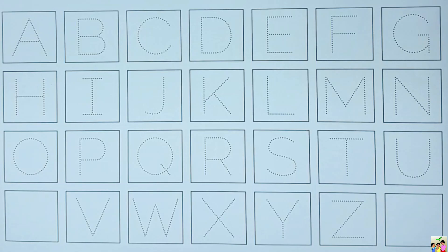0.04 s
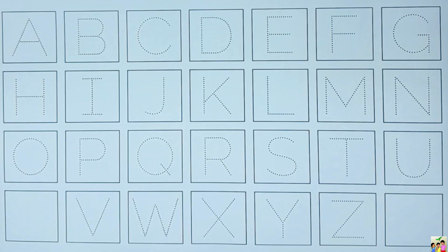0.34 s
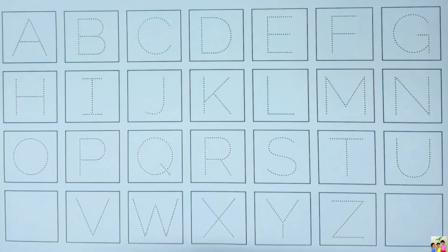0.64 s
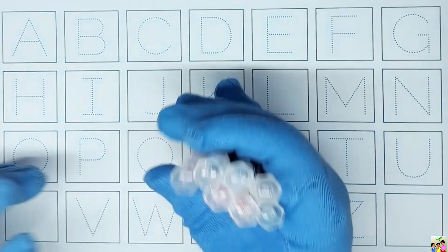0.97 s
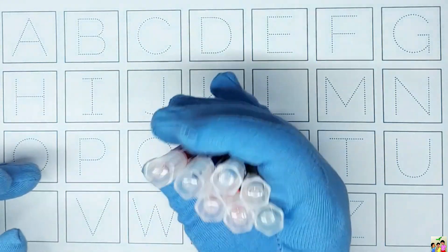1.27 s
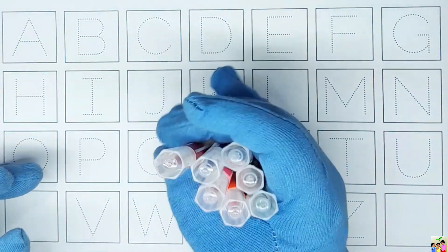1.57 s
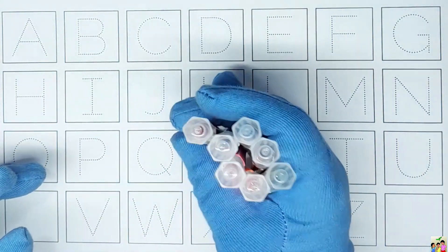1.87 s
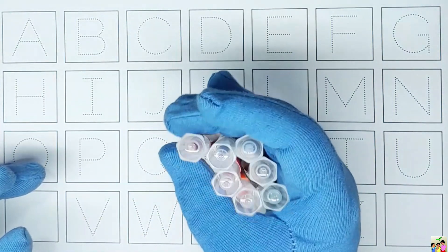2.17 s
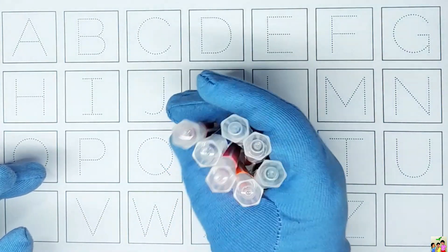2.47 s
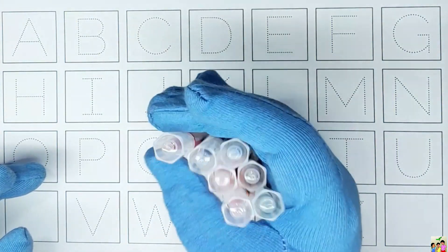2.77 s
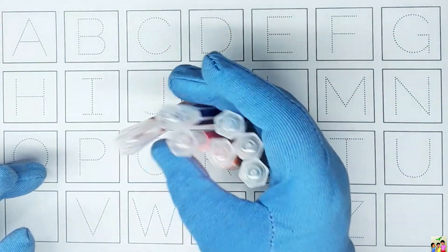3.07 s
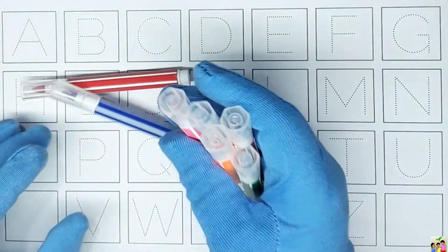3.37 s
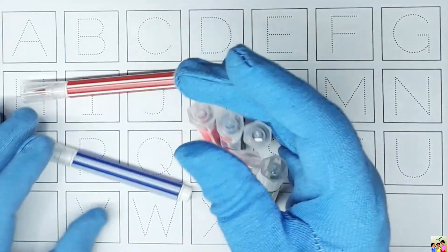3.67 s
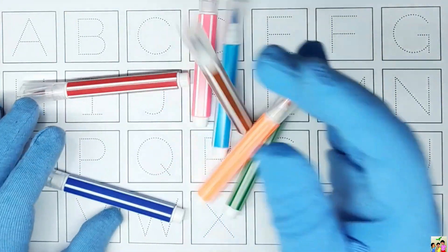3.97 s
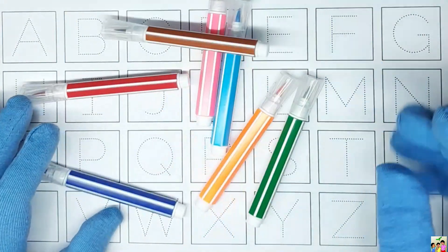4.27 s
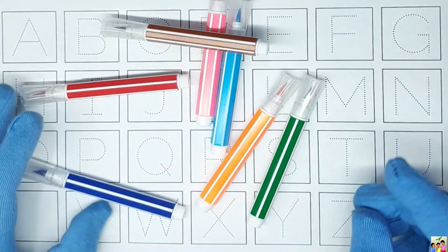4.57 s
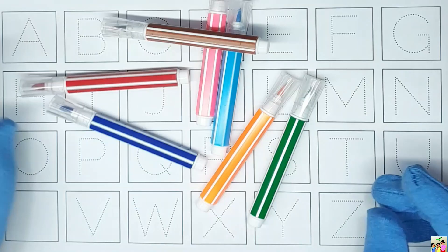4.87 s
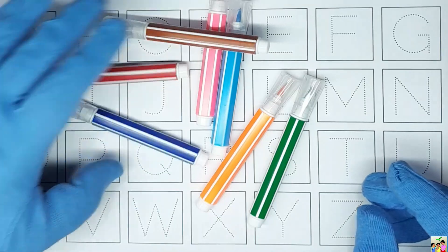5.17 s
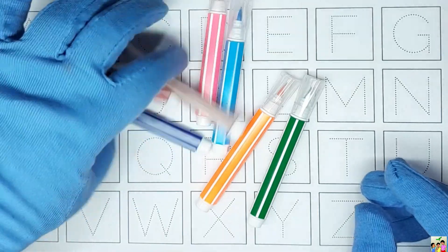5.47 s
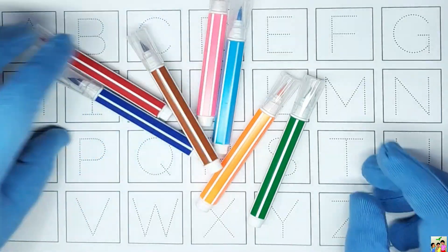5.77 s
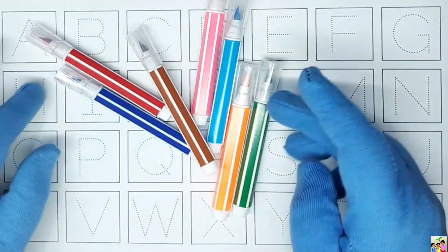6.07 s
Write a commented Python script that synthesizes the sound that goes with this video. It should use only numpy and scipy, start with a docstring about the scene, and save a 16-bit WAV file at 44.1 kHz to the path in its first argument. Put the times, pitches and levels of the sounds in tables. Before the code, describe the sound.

Hollow knocks of bundled plastic pens on a tabletop, followed by loose pens clacking down, soft hand bumps and faint paper rubbing.

```python
"""Thuds, clacks and ticks of plastic felt-tip pens: a gloved hand knocks a bundle upright on a
paper-covered table, lets the pens fall and pushes them about; one rolls over. Each blow rings the
table top, and gloves and barrels rub the paper. A stereo pair hears it slightly from the right, in a
small bare room, far enough off for the walls to ring after every blow.
Underneath lie a low rumble, a faint hum and a thin high whine."""
import sys
import numpy as np
from scipy import signal
from scipy.fft import rfft, irfft, next_fast_len
from scipy.io import wavfile

SR = 44100
rng = np.random.default_rng(int(sys.argv[2]) if len(sys.argv) > 2 else 0)


def log_audio(samples):
    """Write samples as a 16-bit WAV file to the path given in sys.argv[1]."""
    # one column per channel
    frames = np.atleast_2d(samples).T
    # limit to full scale, then quantise
    limited = np.clip(frames, -1, 1)
    pcm = np.round(limited * 32767).astype(np.int16)
    wavfile.write(sys.argv[1], SR, pcm)


N = 278712
BLOW_T = np.arange(SR // 8) / SR  # time axis of one blow, s

# middle modes of the table top: [f/Hz, level/dB, t60/s]
TABLE_BOARD_MODES = [(448, -4.5, 0.1), (486.6, 0.5, 0.063), (511, -12, 0.14), (590.2, -4, 0.099)]
# spectrum of a plastic barrel's tick: [f/Hz, level/dB]
BARREL_TICK = [(1500, -25), (3000, 2), (4800, 0.5), (6200, -1.5), (7500, 0.5), (9500, -10), (13000, -13.5),
               (16000, -18)]


def undb(db):
    """Decibels to gain."""
    return 10 ** (np.asarray(db) / 20)


def along(points, hz):
    """Read (f/Hz, value) points on a log-frequency axis."""
    f, value = np.transpose(points)
    return np.interp(np.log(hz + 1), np.log(f), value)


def colour(x, points):
    """Causal filter with the gain of (f/Hz, level/dB) points."""
    size = 2 * next_fast_len(x.shape[-1])
    cepstrum = irfft(along(points, np.fft.rfftfreq(size, 1 / SR)) * np.log(10) / 20)
    cepstrum[1:size // 2] *= 2  # fold to minimum phase
    cepstrum[size // 2 + 1:] = 0
    return irfft(rfft(x, size) * np.exp(rfft(cepstrum)))[..., :x.shape[-1]]


def high_pass(x, hz):
    """Low cut: below its modes the table top moves too little air to be heard."""
    return signal.sosfilt(signal.butter(4, hz, "high", fs=SR, output="sos"), x)


def fade(t, t60):
    """Exponential decay, 60 dB in t60 seconds."""
    return np.exp(-np.log(1000) * t / t60)


def level(x, db):
    """Scale a steady sound to an rms level."""
    return x * undb(db) / np.sqrt(np.mean(x ** 2))


def unit(x):
    """Scale a short sound to the energy of 10 ms at full level."""
    return x / np.sqrt(np.mean(x ** 2) * x.shape[-1] / (SR / 100))


def pan(db):
    """Gains at the two microphones; negative dB leans right."""
    return undb(np.array([[db], [-db]]) / 2)


def add(track, s, sound):
    """Mix a sound into a track at s seconds."""
    start = int(s * SR)
    track[:, start:start + sound.shape[-1]] += sound[..., :N - start]


def diffuse(size, wide_hz):
    """White noise from all around: long waves reach both microphones alike, short ones unrelated."""
    mid, side = rng.standard_normal((2, size))
    hz = np.fft.rfftfreq(size, 1 / SR)
    apart = hz ** 2 / (hz ** 2 + wide_hz ** 2)
    pair = rfft(mid) + np.array([[1], [-1]]) * apart * rfft(side)
    return irfft(pair / np.hypot(1, apart), size)


def background(wide_hz, waver_db):
    """Room tone: a low rumble from all around, a wavering hum and a narrow hissing whine."""
    # spectra of the rumble and the whine: [f/Hz, relative level/dB]
    rumble_colour = [(20, -17.5), (36, -25), (48, -0.5), (62, -3.5), (80, 0.5), (98, -3.5), (120, -13.5),
                     (200, -12), (350, -21), (600, -20), (1000, -28.5), (2000, -36.5), (5000, -48),
                     (16000, -54.5)]
    whine_colour = [(5600, -32), (6250, -18), (6700, -5), (7100, -1.5), (7500, 3.5), (7900, -7),
                    (8400, -22.5), (9200, -41.5), (9950, -20), (10800, -49.5)]
    # tones of the hum: [f/Hz, rms level/dB]
    hum_tones = [(74.7, -54), (151, -64), (277, -67), (441.4, -70), (739, -64)]
    rumble = level(colour(diffuse(N, wide_hz), rumble_colour), db=-47.5)
    t = np.arange(N) / SR
    knots = np.linspace(0, N / SR, 40)
    hum = np.zeros(N)
    for hz, db in hum_tones:
        waver = waver_db * np.interp(t, knots, rng.standard_normal(len(knots)))
        hum += undb(db + waver) * np.sqrt(2) * np.sin(2 * np.pi * (hz * t + rng.random()))
    whine = level(colour(rng.standard_normal((2, N)), whine_colour), db=-56)
    return rumble + hum + pan(-1.0) * whine


def room(wide_hz, build_s, standing_db):
    """Bare walls: returns a function that adds standing waves and a diffuse tail to the direct sound."""
    # decay of the tail: [f/Hz, t60/s]
    tail_decay = [(200, 0.75), (1000, 0.5), (3000, 0.5474), (7000, 0.47), (15000, 0.49)]
    # spectrum of the tail: [f/Hz, level/dB]
    tail_colour = [(100, -15.5), (200, 1.5), (300, -5), (500, 1.5), (1000, 4), (2500, 4), (5000, 4),
                   (9000, -2), (15000, 1)]
    # standing waves between the walls: [f/Hz, relative level/dB, t60/s]
    wall_modes = [(191.2, -2.5, 0.98), (233.8, -1.5, 0.86), (279.3, -12.5, 0.65), (523.6, 2.5, 0.38),
                  (592.7, -12.5, 0.72), (758.6, 4, 0.52), (1050, -6.5, 0.35), (1120, -18, .5),
                  (1185, 0.5, 0.25), (1430, 16.5, 0.12)]
    t = np.arange(SR * 4 // 5) / SR
    size = 2 * SR
    hz = np.fft.rfftfreq(size, 1 / SR)
    noise = rfft(colour(diffuse(size, wide_hz), tail_colour))
    centres, band_t60 = np.transpose(tail_decay)
    band_gains = [along(list(zip(centres, share)), hz) for share in np.eye(len(centres))]
    bands = np.array([irfft(noise * gain) for gain in band_gains])
    # reflections thicken within milliseconds; the bass lingers longest
    decay = fade(t, band_t60[:, None]) * (1 - np.exp(-(t / build_s) ** 2))
    decay /= np.sqrt(np.mean(np.sum(decay ** 2, axis=1)))
    standing = sum(undb(standing_db + db) * np.cos(2 * np.pi * f * t) * fade(t, t60)
                   for f, db, t60 in wall_modes)

    def echo(sound, wet_db, waves_db):
        """Every spot on the table sends its own reflections to the microphones."""
        spot = int(rng.random() * SR)
        tail = np.einsum("bct,bt->ct", bands[:, :, spot:spot + len(t)], decay)
        direct = t == 0
        response = direct + undb(wet_db) * tail + undb(waves_db) * standing
        return signal.fftconvolve(sound, response, axes=1)
    return echo


def ring(modes, scatter_db, apart, tilt_db=0):
    """Damped modes: the struck spot sets their strengths, and each microphone hears its own phase."""
    hz, db, t60 = np.transpose(modes)[:, :, None]
    strength, turn = rng.standard_normal((2, len(modes), 1))
    octaves = np.log2(hz / hz[0])
    envelopes = undb(db + scatter_db * strength + tilt_db * octaves) * fade(BLOW_T, t60)
    phase = 2 * np.pi * hz * BLOW_T
    pair = np.array([np.sum(-envelopes * np.sin(phase + side * apart * turn), axis=0)
                     for side in (1, -1)])
    contact_s = 0.00022  # the time a blow takes to press home
    return unit(pair * (1 - np.exp(-(BLOW_T / contact_s) ** 2)))


def crack(points, t60, shared):
    """Modes too dense to tell apart: a coloured burst, partly the same at both microphones."""
    common, *own = rng.standard_normal((3, len(BLOW_T)))
    noise = np.sqrt(shared) * common + np.sqrt(1 - shared) * np.array(own)
    return unit(colour(noise * fade(BLOW_T, t60), points))


def thump(scatter_db, low_hz):
    """The dull note of the struck table."""
    # lowest modes of the table top: [f/Hz, level/dB, t60/s]
    thud_modes = [(199.3, -5.5, 0.25), (227, 8, 0.047), (264, 2, 0.041), (296, -10, 0.066)]
    return unit(high_pass(ring(thud_modes, scatter_db, apart=0.14), low_hz))


def sliding(grain_db, attack_s, release_t60):
    """Paper fibres catch and let go in dense, uneven slips; each stroke swells, holds and dies away."""
    # strokes of gloves and barrels over the paper: [t/s, length/s, level/dB]
    strokes = [(0.85, .25, -62.5), (2.033, 0.34, -61.5), (3.2, 0.23, -51.5), (4.847, 0.11, -51.5),
               (5.59, 1, -58.5)]
    # spectrum of the rubbing: [f/Hz, relative level/dB]
    rub_colour = [(200, -18), (800, 5), (1300, 10), (1800, -4), (4000, -16), (9000, -22), (15000, -27)]
    t = np.arange(N) / SR
    effort = np.zeros(N)
    for s, length, db in strokes:
        swell = np.clip((t - s) / attack_s, 0, 1)
        effort += undb(db) * swell * fade(np.maximum(t - s - length, 0), release_t60)
    sizes = undb(grain_db * np.minimum(rng.exponential(size=N), 4))
    slips = rng.standard_normal((2, N)) * sizes * (rng.random(N) < .1)
    return level(colour(slips, rub_colour), db=0) * effort


def hands(echo):
    """Tiny ticks as the barrels shift between the fingers, and soft bumps of the hands."""
    # barrels shifting in the grip: [t/s, level/dB]
    shifts = [(1.608, -50), (1.6477, -57.5), (2.57, -59), (3.254, -59), (3.268, -54), (3.319, -50.5),
              (3.3577, -52.5)]
    # gloved hands bumping the table: [t/s, level/dB]
    bumps = [(3.291, -34), (3.344, -34.5), (3.525, -37.5), (4.204, -35), (4.818, -45), (5.425, -48.5),
             (5.708, -48.5), (6.069, -44.5)]
    out = np.zeros((2, N))
    for s, db in shifts:
        tick = undb(db) * crack(BARREL_TICK, t60=.015, shared=0.53)
        add(out, s, echo(tick, wet_db=-3.5, waves_db=-4))
    for s, db in bumps:
        thud = undb(db) * thump(scatter_db=13.5, low_hz=144)
        add(out, s, echo(thud, wet_db=3.5, waves_db=4.5))
    return out


def pen(db, weight_db, hardness_db):
    """A loose pen lands: hard plastic cracks brightly, and the light barrel thumps the table."""
    # spectrum of the pen's clack: [f/Hz, level/dB]
    clack_colour = [(200, -14.5), (420, 12.5), (700, 5.5), (1400, 6), (2200, 4.5), (3200, 0), (4500, -14),
                    (7000, -24), (12000, -83)]
    thud = thump(scatter_db=0, low_hz=173)
    board = undb(-7) * ring(TABLE_BOARD_MODES, scatter_db=14.5, apart=0.39, tilt_db=-36)
    clack = undb(db) * crack(clack_colour, t60=0.07, shared=0.39)
    tick = undb(db + hardness_db) * crack(BARREL_TICK, t60=0.033, shared=0.36)
    return pan(-1.6) * undb(db + weight_db) * (thud + board) + pan(-2.0) * (clack + tick)


def rolling(echo, start_s, face_s, count):
    """A six-sided pen tips gently off its face, then taps the paper with each next one."""
    out = np.zeros((2, N))
    for face in range(count):
        tap = pen(db=-57.5 if face == 0 else -46.5, weight_db=3, hardness_db=-18.5)
        add(out, start_s + face * face_s, echo(tap, wet_db=-3, waves_db=2))
    return out


def clatter(echo):
    """Pens fall from the hand and are pushed into each other."""
    # hits of loose pens: [t/s, level/dB, weight on the table/dB, hardness of the contact/dB]
    hits = [(3.411, -29, -0.5, -4), (3.468, -36, 3, -8.5), (4.04, -27, 4, -0.5), (4.081, -27.5, -5, 0),
            (4.1, -33, 11, -1), (4.156, -30.5, 6.5, -5.5), (4.281, -33, 7, -5.5), (4.343, -38.5, -7, -4),
            (5.569, -43.5, 12.5, -6), (5.629, -45.5, 14.5, 5), (5.687, -48.5, 14, -5),
            (6.097, -43.5, 7.5, 2)]
    out = np.zeros((2, N))
    for s, db, weight_db, hardness_db in hits:
        add(out, s, echo(pen(db, weight_db, hardness_db), wet_db=-2, waves_db=2))
    return out


def knock(s, db, weight_db):
    """Butt ends meet the table; paper softens the contact, so the top speaks more than the plastic."""
    # the bundle wanders over the table, shifting weight between board modes: [t/s, tilt/dB per octave]
    spot_tilt = [(1.1, 21), (1.5, 23.5), (2.3, -4), (2.95, -3), (3.8, -13.5)]
    # high modes of the table top: [f/Hz, level/dB, t60/s]
    clack_modes = [(759, -9, 0.081), (960.5, -0.5, 0.1), (1042, -1, 0.046), (1112, 8, 0.025),
                   (1214, 3.5, 0.046), (1304, 0, 0.079), (1387, 3.5, .05), (1484, 4, 0.044),
                   (1800, -27, .03), (2100, -21.5, 0.02), (2550, -11.5, 0.034)]
    # spectra of the dense short ringing and of the plastic's tick: [f/Hz, level/dB]
    dense_colour = [(200, -40), (400, 2.5), (750, -6.5), (1050, 3.5), (1550, -8.5), (1900, -4),
                    (2700, -10.5), (3200, -26.5), (5000, -39), (10000, -67)]
    tick_colour = [(1500, -2.5), (3000, 2), (5000, -0.5), (6200, -2.5), (7800, 4), (9200, -10.5),
                   (12000, -12.5), (16000, -24)]
    thud = undb(db + weight_db) * thump(scatter_db=2.5, low_hz=200)
    tilt_db = np.interp(s, *np.transpose(spot_tilt))
    board = undb(-3) * ring(TABLE_BOARD_MODES, scatter_db=6, apart=0.67, tilt_db=tilt_db)
    clack = undb(-6) * ring(clack_modes, scatter_db=4, apart=0.56)
    dense = undb(-2.5) * crack(dense_colour, t60=0.038, shared=0.05)
    table = undb(db) * high_pass(board + clack + dense, hz=270)
    tick_db = -13 + 1.24 * db  # the tick grows faster than the blow
    tick = undb(tick_db) * crack(tick_colour, t60=0.028, shared=0.36)
    return pan(-1.7) * thud + pan(-3.0) * table + pan(-0.79) * tick


def bundle(echo):
    """Every knock is double: the lowest pen touches, then the rest with the hand behind them."""
    # knocks of the bundle: [t/s, lag of the rest/s, level/dB, weight of the hand/dB]
    blows = [(1.102, 0.0029, -26, -5), (1.117, 0.013, -15, -10.5), (1.446, 0.0091, -14.5, -8.5),
             (1.709, 0.0023, -37.5, -19), (1.739, 0.0037, -24, -6.5), (1.783, 0.00204, -26, -2.5),
             (2.288, .008, -23.5, -2), (2.485, 0.0053, -39.5, -1), (2.923, .014, -20, -3.5),
             (2.969, .012, -19, -2.5), (3.602, 0.0098, -21, -7), (3.664, 0.0046, -37.5, 1.5),
             (3.788, .017, -17.5, -8)]
    out = np.zeros((2, N))
    for s, lag, db, weight_db in blows:
        first = knock(s, db, weight_db)
        rest = knock(s, db - 1, weight_db + 4.5)  # a little softer but heavier
        for start, sound in ((s, first), (s + lag, rest)):
            add(out, start, echo(sound, wet_db=-2, waves_db=3))
    return out


def scene():
    """Pens, hands and table in the small room, as they reach the stereo pair."""
    echo = room(wide_hz=420, build_s=0.0074, standing_db=-58.5)
    pens = bundle(echo) + clatter(echo) + rolling(echo, start_s=4.82, face_s=.0301, count=5)
    handling = hands(echo) + sliding(grain_db=-0.5, attack_s=0.044, release_t60=.5)
    return pens + handling + background(wide_hz=250, waver_db=-1.5)


def record(dry):
    """The recorder holds the peaks at full scale and cuts the top above 16.2 kHz."""
    top_cut = signal.ellip(10, .1, 80, 16200, fs=SR, output="sos")
    return signal.sosfilt(top_cut, np.clip(dry, -1, 1))


dry = scene()
out = record(dry)
log_audio(out)
```